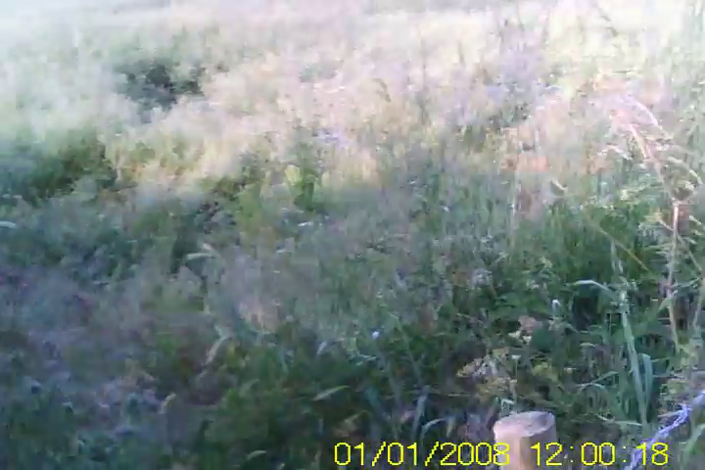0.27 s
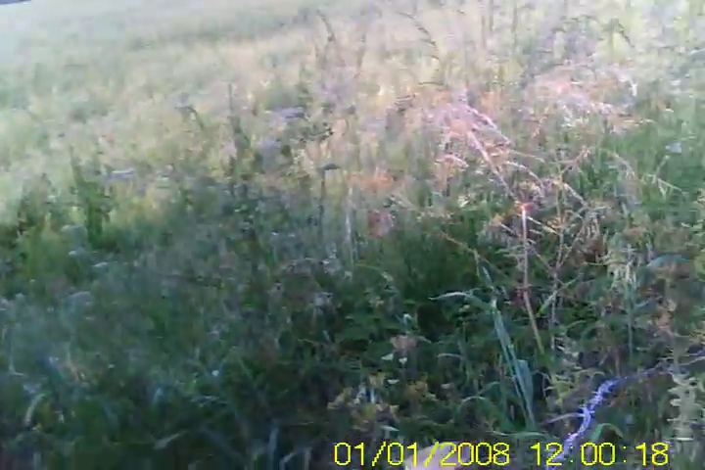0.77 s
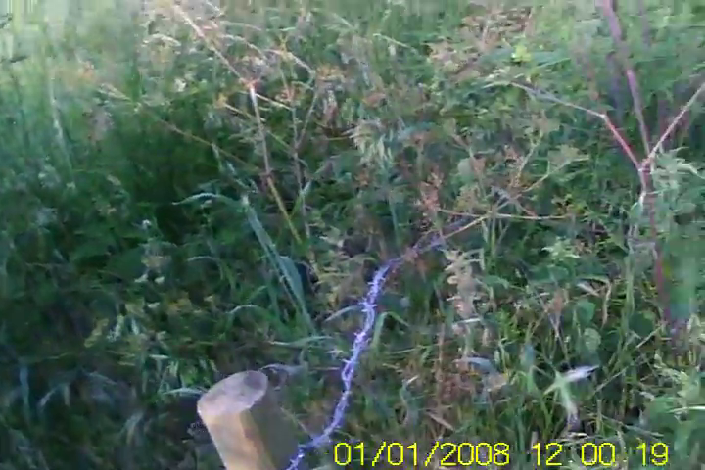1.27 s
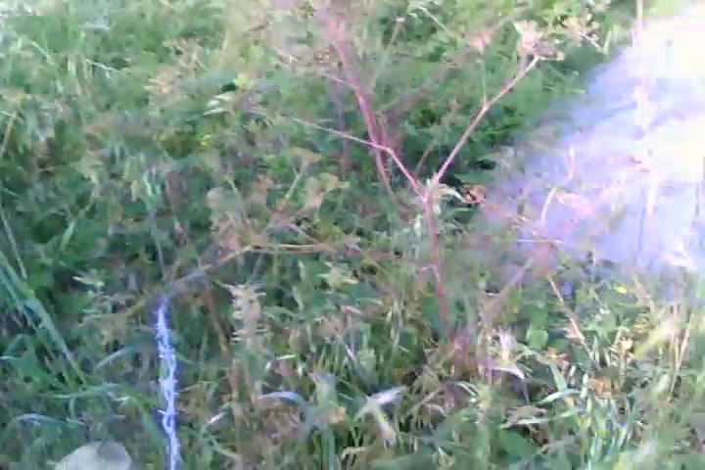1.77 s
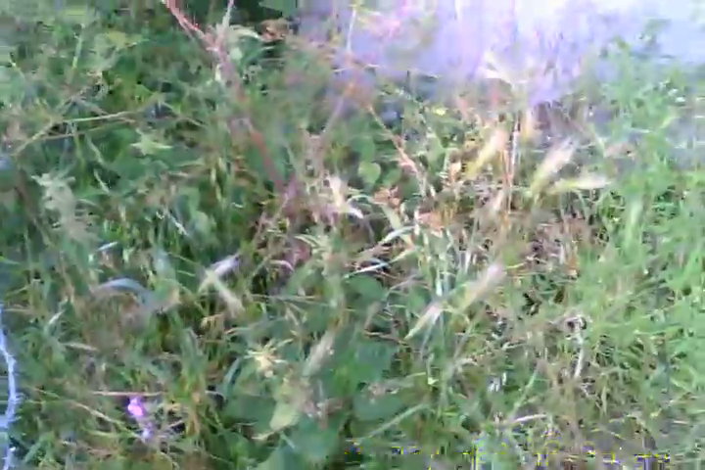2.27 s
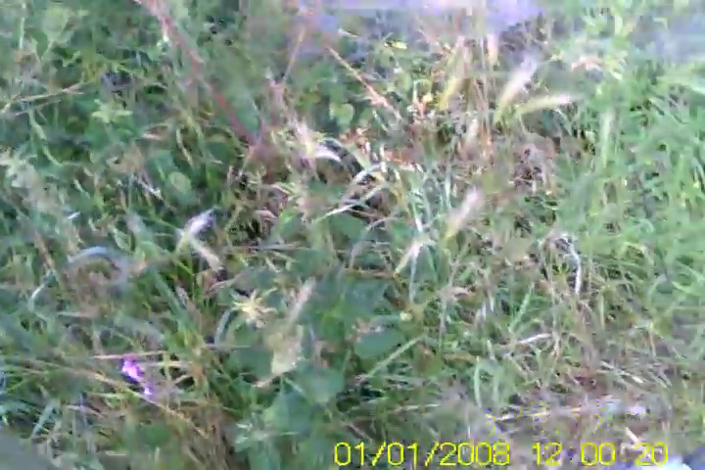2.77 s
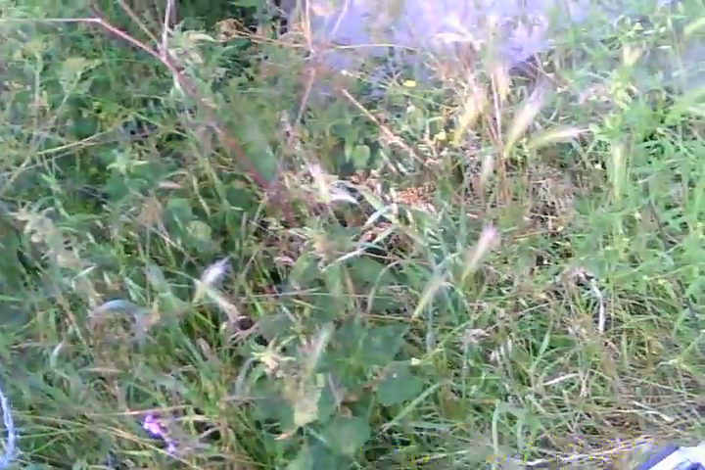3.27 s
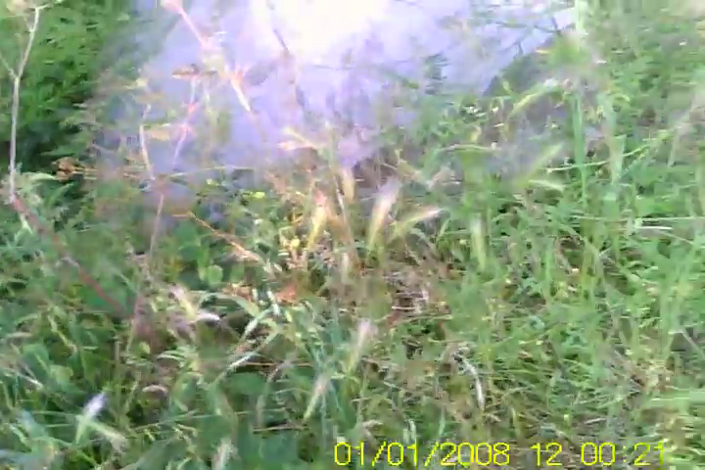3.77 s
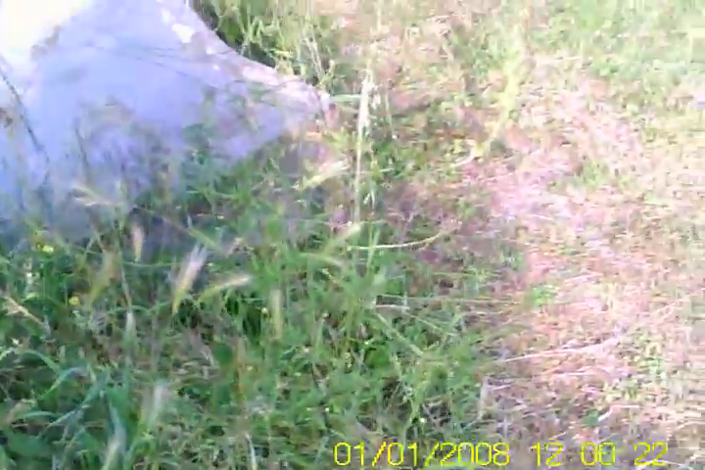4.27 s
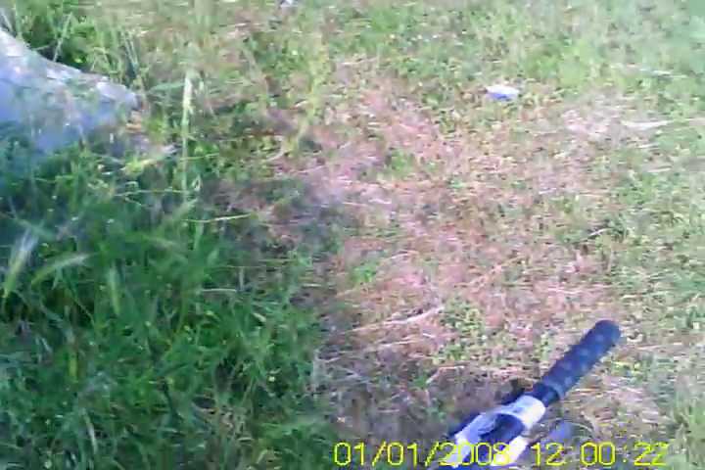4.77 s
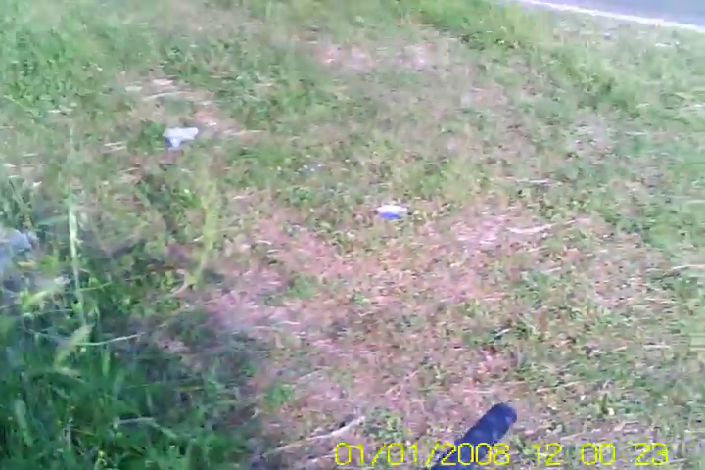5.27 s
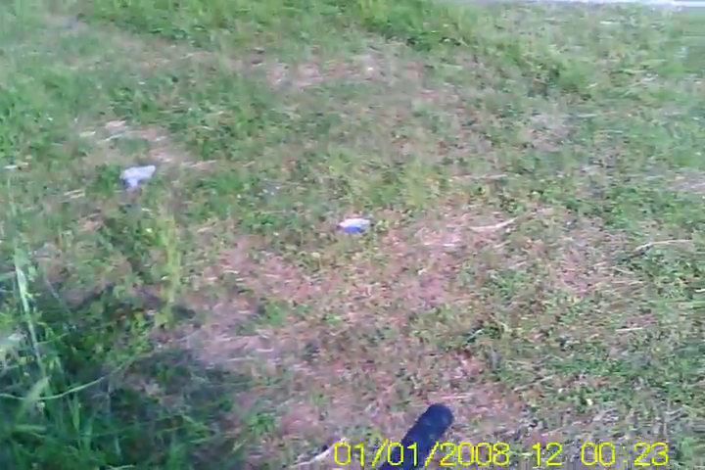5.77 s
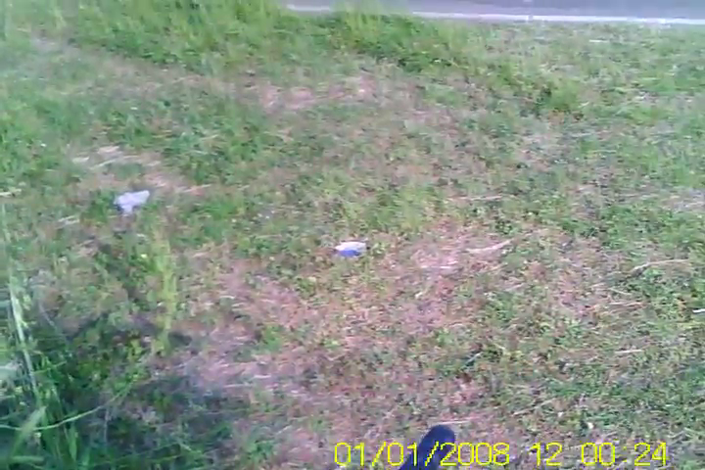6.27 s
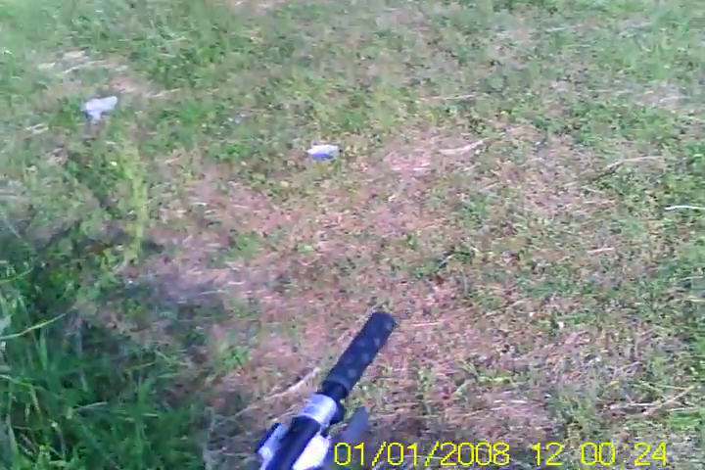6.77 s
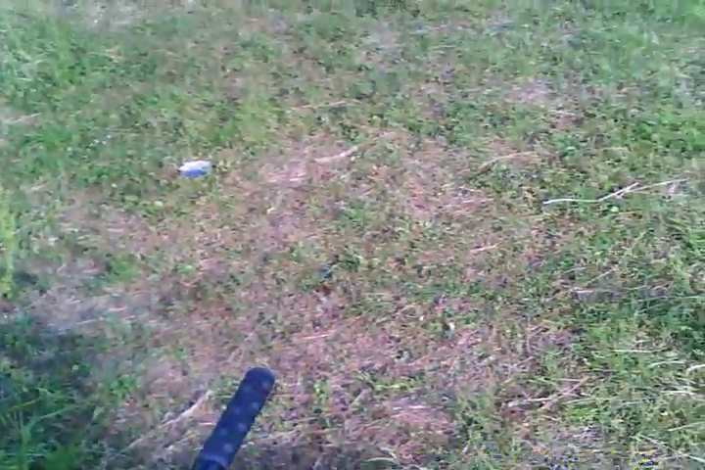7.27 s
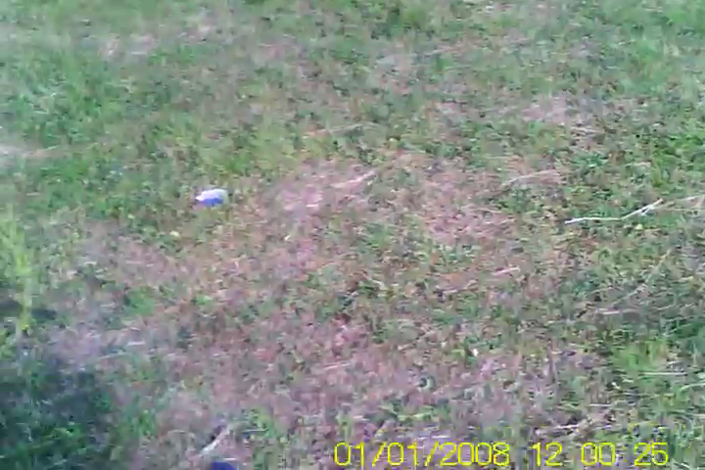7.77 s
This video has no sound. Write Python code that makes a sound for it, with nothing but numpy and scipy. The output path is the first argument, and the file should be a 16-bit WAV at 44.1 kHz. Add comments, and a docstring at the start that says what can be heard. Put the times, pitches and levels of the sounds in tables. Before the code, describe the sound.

A small, cheap camera microphone carries a constant low, rough electrical throb, a slightly irregular fluttering of about thirty to forty pulses a second that gets a little busier, with soft hiss and barely audible thin whines. Faint bird chips and a quick trilled song open the scene, with whistles around 1 second. Light ticks patter at 0.7-0.95, then the loudest hard, hollow clack and scrape hits at 1.5. Grass brushes in swells near 1.9 and 2.8, with knocks at 2.1 and a cluster around 2.75. Another firm knock comes at 3.6, followed by a rustle. A brighter dry swish passes at 4.7, and bird chips repeat around 5. After a calmer stretch, a tap and rustle come at 6.5 with the warbling song again, chips from 7.3, and a dull knock at 7.5 before the grass quiets by 8.

```python
"""A field edge with long grass, where someone wearing a small camera pushes a bicycle.
Stalks knock, tick and drag on the casing, heard as decaying modes of casing and mount.
Grass rustles as dense filtered ticks; birds sing as gliding sines, some with scattered echoes.
Under it all the camera's supply sags with every burst of work and throbs in the microphone
amplifier, which adds hiss and faint whines."""
import sys
import numpy as np
from scipy import signal
from scipy.fft import rfft, irfft
from scipy.io import wavfile
from scipy.ndimage import uniform_filter1d

SR = 44100
rng = np.random.default_rng(int(sys.argv[2]) if len(sys.argv) > 2 else 0)


def rack_gain(trim_db):
    """Turn a fader trim in dB into the linear factor to multiply a signal by."""
    fader = np.asarray(trim_db, float)
    return 10 ** (fader / 20)


def pcm_store(signal):
    """Save signal as 16-bit PCM."""
    levels = np.round(np.clip(np.atleast_2d(signal), -1, 1) * 32767)
    wavfile.write(sys.argv[1], SR, levels.astype(np.int16).T)


N = 354167

# Amplifier hiss spectrum. Each row: frequency in Hz, relative density in dB per Hz.
HISS_SPECTRUM = [(200, -15), (260, -8), (350, -6), (600, -10), (1000, -12), (2000, -18), (5000, -21),
                 (9500, -22.5), (12500, -34)]
# Faint tones of the electronics. Each row: mean frequency in Hz, level in dB rms.
WHINES = [(3894, -80), (5600, -82), (7400, -84), (9600, -87)]
# Grass against legs and wheels. Each row: time in seconds, level in dB before clumping.
RUSTLE_LEVEL = [(0.0, -63.5), (.55, -68), (.78, -61), (1.3, -71.5), (1.6, -66), (1.86, -58.5),
                (2.02, -62.5), (2.28, -64.5), (2.5, -63), (2.77, -61.5), (2.93, -72), (3.66, -64),
                (3.75, -57), (3.86, -69.5), (4.32, -71.5), (4.75, -59), (5.03, -63.5), (5.12, -71),
                (6.25, -71.5), (6.62, -60), (6.9, -61.5), (7.1, -69.5), (7.5, -64.5), (8.03, -78)]
# Spectrum of brushing blades. Each row: frequency in Hz, relative density in dB per Hz.
BLADE_SPECTRUM = [(250, -15), (500, -3), (1000, -2.5), (1600, 0.5), (2400, -10), (3500, -11.5), (5000, -34)]
# Spectrum of dry seed heads. Each row: frequency in Hz, relative density in dB per Hz.
SEED_HEAD_SPECTRUM = [(700, -1), (1600, 0.5), (2500, -5), (3600, -5), (4800, -13), (6900, -10), (8400, -2),
                      (10000, -9), (12000, -20)]
# Modes of the casing and microphone port. Each row: nominal frequency in Hz,
# level in dB before the blow's own weighting, nominal 60 dB decay time in seconds.
CASING_MODES = [(381, 4.5, 0.036), (451, 1.5, 0.052), (762, -7.5, 0.05), (944, 3.5, 0.023),
                (1272, -5, 0.035), (1560, 6.5, 0.014), (1870, -6.5, 0.033), (2285, 3, 0.0087),
                (3200, 3, 0.014), (3930, -7, 0.035), (6430, -7, 0.02), (7800, -6, 0.0091),
                (8210, -5.5, 0.01), (8540, -11, 0.016)]
# Stalks striking the casing. Each row: start in seconds, level in dB before a common trim,
# treble in dB relative to that, strongest pitch in Hz, focus in dB per octave away from it.
KNOCKS = [(0.71, -35.5, -14, 1330, 22), (0.724, -36.5, -15, 1550, 8), (0.744, -39.5, 1, 1590, -2),
          (0.784, -32, -8, 1880, 11), (0.841, -36.5, -32, 1010, 1), (0.951, -35.5, -22, 1800, 12),
          (1.471, -14, -36, 970, 16.5), (1.495, -20.5, -37, 700, 8), (1.498, -28, -28, 1500, 10),
          (1.509, -25.5, 1, 1600, 6), (1.514, -30.5, -2, 1900, 15), (1.517, -27, -36, 1270, 35),
          (1.546, -28.5, -20, 1570, 24), (1.568, -26.5, -27, 1730, 10), (1.98, -35, -27, 1110, 17),
          (2.092, -25, -20.5, 1030, 5.5), (2.731, -31, -17, 900, 5), (2.735, -27, -24, 1300, 30),
          (2.742, -29.5, -6.5, 1870, 18), (2.752, -27, -32, 1300, 32), (2.847, -35, -26, 1090, 20),
          (2.862, -36, -28, 1870, 33), (2.882, -37, -25, 1800, 15), (3.354, -31, -14, 1750, 7.5),
          (3.443, -38, -22, 1500, 15), (3.64, -19.5, -18.5, 860, 11), (3.791, -57, 20, 918, 10),
          (4.018, -37.5, -21, 1560, 19), (4.412, -33, -29, 1720, 6.5), (4.836, -30.5, -42, 1490, 8),
          (4.911, -37, -26, 1250, 15), (6.451, -34, -20, 1700, 21), (7.5, -30.5, -30, 703, 17),
          (7.733, -40.5, -15, 1610, 15)]
# Stalks dragging over the casing. Each row: start in seconds, 60 dB decay time in seconds,
# starting level in dB rms, relative treble in dB, strongest pitch in Hz.
SCRAPES = [(.743, 0.032, -39, 3, 1740), (1.496, 0.063, -36, -13, 900), (1.507, 0.099, -36.5, -11, 1510),
           (2.725, 0.13, -49.5, -7, 1950), (2.736, 0.14, -38.5, -11.5, 1280), (2.846, 0.19, -44, -22, 796),
           (6.455, 0.15, -49, -12, 2010)]
# Modes of the mount. Each row: frequency in Hz, 60 dB decay time in seconds.
MOUNT_MODES = [(131, 0.44), (195, 0.12), (235, 0.08), (460, 0.19), (612, 0.23)]
# Jolts through the mount. Each row: start in seconds, level of the strongest mode in dB,
# strongest pitch in Hz.
JOLTS = [(1.471, -20, 185), (2.091, -37, 215), (2.851, -29, 133), (2.862, -38, 466), (2.864, -31.5, 240),
         (3.64, -36, 235), (3.715, -36, 257), (7.5, -33.5, 219)]
# Runs of chips from the nearest bird. Each row: first chip in seconds, last chip in seconds,
# typical level in dB.
CHIP_RUNS = [(0.09, 0.295, -63), (2.462, 3.215, -67), (4.89, 5.417, -61), (7.272, 7.816, -62)]
# One song: a trilled climb, a drop, a blur and a warble. Each row: seconds after the song's
# start, length in seconds, start in Hz, end in Hz, level in dB before the song's gain,
# waver as a share of pitch.
SONG = [(0, .045, 4150, 5100, -66.5, .025), (0.035, .062, 5500, 6660, -65.5, .05),
        (0.104, 0.031, 6480, 5300, -59, 0.018), (0.304, 0.05, 6200, 5750, -65, 0.045),
        (.501, 0.067, 3370, 3760, -61, 0.0046), (0.57, 0.02, 3630, 3100, -59, 0.018),
        (0.58, 0.056, 3350, 3750, -66.5, 0.014), (0.638, 0.035, 3730, 3180, -69, 0.019)]
# Performances of the song. Each row: start in seconds, gain in dB.
SONG_STARTS = [(.13, -1), (6.528, 1)]
# Single whistles of other birds. Each row: start in seconds, length in seconds,
# start in Hz, end in Hz, level in dB.
WHISTLES = [(.397, .13, 5450, 4700, -70.5), (.572, .045, 5480, 5300, -70), (.915, .09, 3420, 3380, -69),
            (.919, .036, 3700, 2680, -62), (.968, .02, 2650, 2780, -65), (1.042, .03, 3450, 3600, -63),
            (1.075, .1, 3330, 3170, -64), (2.17, .16, 1810, 1780, -68), (6.734, .03, 4300, 3800, -62),
            (6.85, .15, 4900, 3900, -67), (6.91, .1, 1680, 1640, -70), (7.15, .11, 2130, 1960, -67.5)]
# Long upward slurs. Each row: start in seconds, length in seconds, level in dB.
SLURS = [(1.167, 0.2, -66.5), (2.051, 0.22, -64), (4.54, .22, -69), (6.803, 0.15, -66.5)]
# Short thin seeps. Each row: start in seconds, level in dB.
SEEPS = [(4.082, -69), (4.26, -68)]
# Glides of chip, pip, slur and seep. Each: start, middle and end pitch in Hz.
CHIP_GLIDE_HZ = (3265, 3230, 2880)
PIP_GLIDE_HZ = (4120, 4360, 4500)
SLUR_GLIDE_HZ = (3200, 3770, 4000)
SEEP_GLIDE_HZ = (5120, 4990, 5060)

HISS_DB = -59.5  # rms
SAG_DB, SETTLE_S, COUPLING_HZ = -20.5, .0034, 4.5
BURST_S, PAUSE_AT_S, PAUSE_S = .0135, .0072, .00189  # typical burst, and the pause within it
# long gap between burst starts; a growing share of bursts follows at half of it
GAP_S, HALF_GAP_SHARE, SHARE_GROWTH_PER_S = .035, .22, .016
# one long stroke of dry seed heads
SWISH_PEAK_S, SWISH_DB, SWISH_RISE_S, SWISH_FALL_S = 4.71, -57, .09, .06
DRAG_PER_S, DRAG_SPREAD_DB = 3500, 3.0  # small blows of uneven size
CHIP_S, CHIP_GAP_S, CHIP_SPREAD_DB = .0234, .107, -.9  # gap is approximate
PIP_S, PIP_LEAD_S, PIP_DB = .021, .031, -10  # level relative to the run
SLOWING = .065  # each run starts quick and drags a little
LAST_CHIP_DROP = .041  # share of pitch by which the final chip is lower
SEEP_S = .035
OFFSET = -.0069  # full scale is 1


def evened(x):
    """Normalization: scales a signal to rms 1."""
    return x / np.sqrt(np.mean(x ** 2) + 1e-20)


def add(mix, s, sound):
    """Superposition: adds a sound to the mix from s seconds on."""
    part = mix[round(s * SR):][:len(sound)]
    part += sound[:len(part)]


def coloured(x, points):
    """Spectral shaping: weights x by a spectrum in dB, then scales it to rms 1."""
    f, db = np.transpose(points)
    hz = np.fft.rfftfreq(len(x), 1 / SR)
    gain_db = np.interp(np.log(hz + 1), np.log(f + 1), db, left=-80, right=-80)
    return evened(irfft(rfft(x) * rack_gain(gain_db), len(x)))


def settle(x, seconds):
    """Exponential relaxation: one resistor-capacitor low-pass stage."""
    r = np.exp(-1 / (seconds * SR))
    return signal.lfilter([1 - r], [1, -r], x)


def crackle(count, per_s, spread_db):
    """Shot noise: random tiny ticks of uneven size."""
    dice, sign, size = rng.random(count), rng.standard_normal(count), rng.exponential(1, count)
    return (dice < per_s / SR) * sign * rack_gain(spread_db * np.minimum(size, 4))


def electronics(drift_hz=4.73):
    """Amplifier noise: shaped random hiss, and faint sines sharing a slow frequency drift."""
    t = np.arange(N) / SR
    drift = np.cumsum(drift_hz * evened(uniform_filter1d(rng.standard_normal(N), 4000))) / SR
    whine = sum(rack_gain(db) * np.sqrt(2) * np.sin(2 * np.pi * (hz * t + drift)) for hz, db in WHINES)
    return rack_gain(HISS_DB) * coloured(rng.standard_normal(N), HISS_SPECTRUM) + whine


def load_bursts(jitter=.07, length_jitter=.12, size_jitter=.12, pause_jitter=.138,
                pause_depth=.4, close_size=.87):
    """Switched load: each burst is a negative step of voltage with a short partial release."""
    dice, normals = rng.random(500), rng.standard_normal((500, 4))
    steps, now, close = np.zeros(N + SR), 0., False
    for chance, (bigger, late, longer, wander) in zip(dice, normals):
        if now * SR >= N:
            break
        size = (1 + size_jitter * bigger) * (close_size if close else 1)
        pause = PAUSE_AT_S * max(1 + pause_jitter * wander, .3)
        end = max(BURST_S * (1 + length_jitter * longer), pause + PAUSE_S)
        at = now + np.array([0, pause, pause + PAUSE_S, end])
        steps[(at * SR).astype(int)] += size * np.array([-1, pause_depth, -pause_depth, 1])
        close = chance < HALF_GAP_SHARE + SHARE_GROWTH_PER_S * now
        now += GAP_S * (.5 if close else 1) * (1 + jitter * late)
    return np.cumsum(steps)[:N]


def supply(edge_s=.00031, slow_share=.5, slow_s=.0098, other_load=.13, other_s=.0063):
    """Capacitor charging: load pulls the voltage down, and a coupling capacitor passes the change."""
    load = settle(load_bursts(), edge_s)
    load = load + other_load * evened(settle(rng.standard_normal(N), other_s))  # irregular loads
    small_capacitor, large_capacitor = settle(load, SETTLE_S), settle(load, slow_s)
    volts = (1 - slow_share) * small_capacitor + slow_share * large_capacitor
    volts = volts - volts.mean()
    return rack_gain(SAG_DB) * (volts - settle(volts, 1 / (2 * np.pi * COUPLING_HZ)))


def note(length, glide_hz, flutter_db=3.0, waver=.022, fade_db=2.3):
    """Frequency modulation: a sine glides through three pitches, trembling in pitch and level."""
    wobble, flutter = (evened(uniform_filter1d(v, 120)) for v in rng.standard_normal((2, 16000)))
    count = round(length * SR)
    u = np.arange(count) / (length * SR)
    start, middle, end = glide_hz
    # parabola through the three pitches
    hz = start * (1 - u) * (1 - 2 * u) + middle * 4 * u * (1 - u) + end * u * (2 * u - 1)
    tone = np.sqrt(2) * np.sin(2 * np.pi * np.cumsum(hz * (1 + waver * wobble[:count])) / SR)
    level = rack_gain(flutter_db * flutter[:count] - fade_db * u)
    return tone * level * signal.windows.tukey(count, .35)


def straight_note(length, start_hz, end_hz, waver):
    """Linear glide: a note whose middle pitch is the mean of its ends."""
    return note(length, (start_hz, (start_hz + end_hz) / 2, end_hz), waver=waver)


def nearest_bird(late_s=.002):
    """Repeated short glides: runs of falling chips, a thin rising pip ahead of each."""
    chips, pips = np.zeros((2, N))
    for first, last, db in CHIP_RUNS:
        u = np.linspace(0, 1, round((last - first) / CHIP_GAP_S) + 1)
        beats = first + (last - first) * (u - SLOWING * u * (1 - u))
        chances = rng.standard_normal((len(beats), 3))
        for s, final, (late, louder, pip_louder) in zip(beats, u == 1, chances):
            glide_hz = np.multiply(CHIP_GLIDE_HZ, 1 - LAST_CHIP_DROP * final)
            chip = note(CHIP_S, glide_hz, flutter_db=2.5, waver=.016, fade_db=2.5)
            add(chips, s + late_s * late, rack_gain(db + CHIP_SPREAD_DB * louder) * chip)
            pip = note(PIP_S, PIP_GLIDE_HZ, flutter_db=3, waver=.015)
            add(pips, s - PIP_LEAD_S, rack_gain(db + PIP_DB + CHIP_SPREAD_DB * pip_louder) * pip)
    return chips, pips


def other_birds():
    """Gliding whistles: songs, slurs, seeps and single notes, each a modulated sine."""
    out = np.zeros(N)
    for start, gain_db in SONG_STARTS:
        for s, length, start_hz, end_hz, db, waver in SONG:
            sung = straight_note(length, start_hz, end_hz, waver)
            add(out, start + s, rack_gain(db + gain_db) * sung)
    for s, length, db in SLURS:
        add(out, s, rack_gain(db) * note(length, SLUR_GLIDE_HZ, flutter_db=3, waver=.016, fade_db=4))
    for s, db in SEEPS:
        add(out, s, rack_gain(db) * note(SEEP_S, SEEP_GLIDE_HZ, flutter_db=1, waver=.003))
    for s, length, start_hz, end_hz, db in WHISTLES:
        add(out, s, rack_gain(db) * straight_note(length, start_hz, end_hz, .017))
    return out


def hedge_scatter(x, echo_db=-3, echo_t60=.48):
    """Diffuse scattering: hedges return a decaying random train of echoes."""
    n = np.arange(12000)
    echoes = rng.standard_normal(12000) * rack_gain(-60 * n / SR / echo_t60)
    echoes *= np.minimum(n / 600, 1)  # they build up after the direct sound
    return rack_gain(echo_db) * signal.fftconvolve(x, echoes / np.linalg.norm(echoes))[:N]


def birds():
    """Direct and scattered sound: the chips stay dry, all other bird notes gain echoes."""
    chips, pips = nearest_bird()
    scattered = pips + other_birds()
    return chips + scattered + hedge_scatter(scattered)


def rustle(per_s=7000, spread_db=2.0, clump_db=1.7):
    """Friction as shot noise: blades tick past in clumps, and dry seed heads hiss brighter."""
    t = np.arange(N) / SR
    clumps = evened(uniform_filter1d(rng.standard_normal(N), 900))
    blades = coloured(crackle(N, per_s, spread_db), BLADE_SPECTRUM)
    blades = rack_gain(np.interp(t, *np.transpose(RUSTLE_LEVEL))) * blades
    width = np.where(t < SWISH_PEAK_S, SWISH_RISE_S, SWISH_FALL_S)
    stroke = np.exp(-.5 * ((t - SWISH_PEAK_S) / width) ** 2)  # bell-shaped swell
    heads = rack_gain(SWISH_DB) * stroke * coloured(crackle(N, per_s, spread_db), SEED_HEAD_SPECTRUM)
    return rack_gain(clump_db * clumps) * blades + rack_gain(.5 * clump_db * clumps) * heads


def jolt(pitch_hz, slope_db=45):
    """Modal excitation of the mount: the mode nearest the jolt's pitch rings most."""
    hz, t60 = np.transpose(MOUNT_MODES)[:, :, None]
    t = np.arange(8000) / SR
    share_db = -slope_db * abs(np.log2(hz / pitch_hz))
    level = rack_gain(share_db - share_db.max() - 60 * t / t60)
    return -(level * np.sin(2 * np.pi * hz * t)).sum(0)


def ring(treble_db, pitch_hz, focus_db, chance, length, body_hz=500, dull_share=.34,
         onset_cycles=.91, body_slope_db=7, detune=.025, uneven_db=1.5):
    """Modal excitation of the casing: a blow's pitch and treble weight its decaying modes."""
    hz, db, t60 = np.transpose(CASING_MODES)[:, :, None]
    t = np.arange(4000) / SR
    low = hz < 600  # the lowest modes move together
    octaves = abs(np.log2(np.where(low, body_hz, hz) / pitch_hz))
    focused_db = -np.where(low, body_slope_db, focus_db) * octaves
    share_db = np.where(hz > 5000, treble_db, focused_db)
    # dull blows also lose their upper middle
    upper_middle = (hz > 2100) & (hz < 5000)
    share_db = share_db + np.where(upper_middle, dull_share * min(treble_db + 11, 0), 0)
    shift, strength = chance.T[:, :, None]
    # each mode swings up within its first cycle
    onset = np.sin(np.pi / 2 * np.minimum(t * hz / onset_cycles, 1)) ** 2
    level = rack_gain(db + share_db + uneven_db * strength - 60 * t / (t60 * length))
    return -(onset * level * np.sin(2 * np.pi * hz * (1 + detune * shift) * t)).sum(0)


def scrape(t60, treble_db, pitch_hz):
    """Repeated impact: a dragging stalk is a dying rain of small blows on the casing."""
    t = np.arange(8000) / SR
    unvaried = np.zeros((len(CASING_MODES), 2))
    blow = ring(treble_db, pitch_hz, 7.5, unvaried, .45)
    rain = signal.fftconvolve(crackle(8000, DRAG_PER_S, DRAG_SPREAD_DB), blow)[:8000]
    return rack_gain(-60 * t / t60) * evened(rain)


def knocks(gain_db=-2.5, damping=.028, crack_db=-12, crack_t60=.003):
    """Impact: stalks ring the casing with a noisy contact; jolts and scrapes join them."""
    out, t = np.zeros(N), np.arange(8000) / SR
    chances = rng.standard_normal((len(KNOCKS), len(CASING_MODES), 2))
    for (s, db, treble_db, pitch_hz, focus_db), chance in zip(KNOCKS, chances):
        length = np.clip(1 + damping * (db + 12), .3, 1.5)  # light ticks die sooner than hard blows
        contact = rack_gain(treble_db + crack_db - 60 * t / crack_t60) * rng.standard_normal(8000)
        add(out, s, rack_gain(db + gain_db) * ring(treble_db, pitch_hz, focus_db, chance, length))
        add(out, s, rack_gain(db + gain_db) * contact)
    for s, db, pitch_hz in JOLTS:
        add(out, s, rack_gain(db) * jolt(pitch_hz))
    for s, t60, db, treble_db, pitch_hz in SCRAPES:
        add(out, s, rack_gain(db) * scrape(t60, treble_db, pitch_hz))
    return out


def scene():
    """Superposition: everything that reaches the amplifier output, as one channel."""
    return (electronics() + supply() + birds() + rustle() + knocks())[None]


def band_limit(x):
    """A steep low-pass at the top of the band."""
    return signal.sosfilt(signal.butter(12, 12240, fs=SR, output="sos"), x)


def record(dry, edge_hz=10000, fall_db=3.5):
    """Band limiting: the converter rolls off the treble gently and adds a constant offset."""
    hz = np.fft.rfftfreq(N, 1 / SR)
    khz_past = np.clip((hz - edge_hz) / 1000, 0, 4)
    roll = rack_gain(-fall_db * khz_past ** 2)  # steeper with each kHz, level beyond the fourth
    mix = irfft(rfft(dry) * roll, N) + OFFSET
    return band_limit(mix)


dry = scene()
out = record(dry)
pcm_store(out)
```